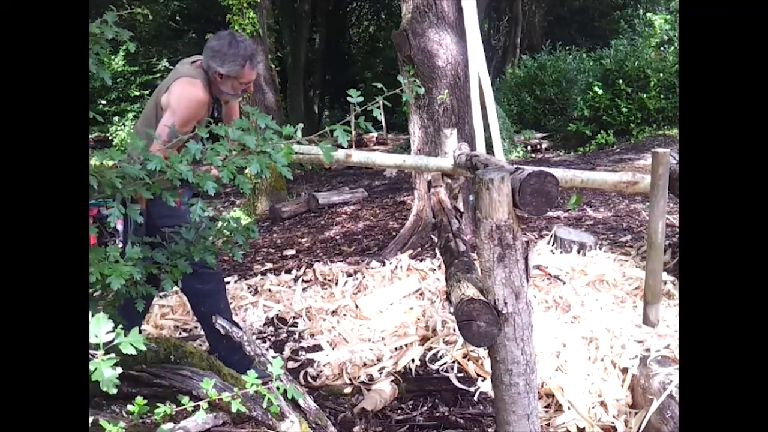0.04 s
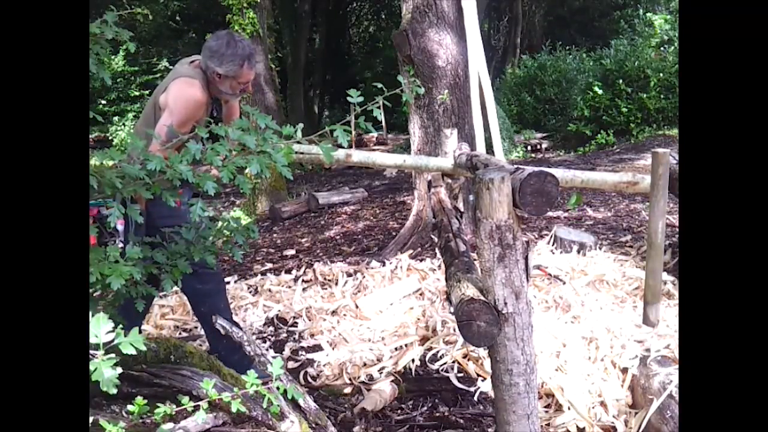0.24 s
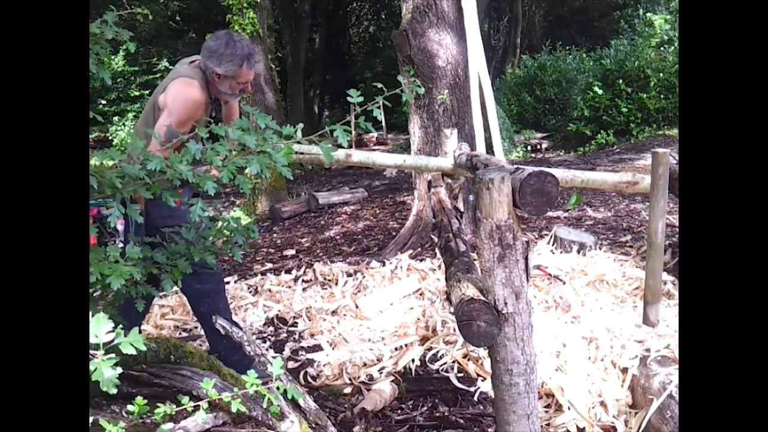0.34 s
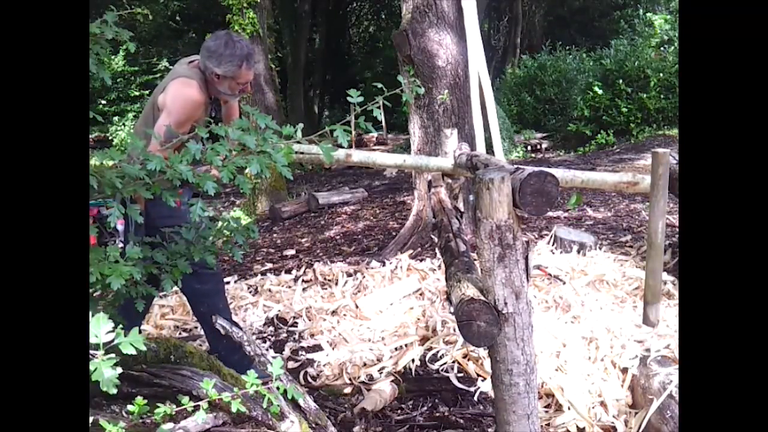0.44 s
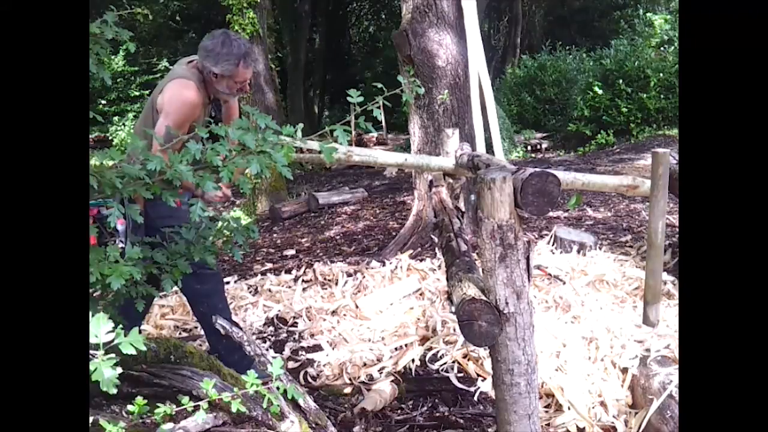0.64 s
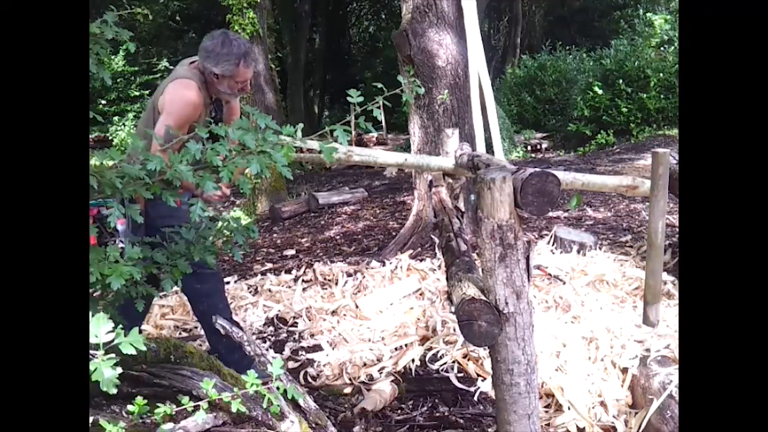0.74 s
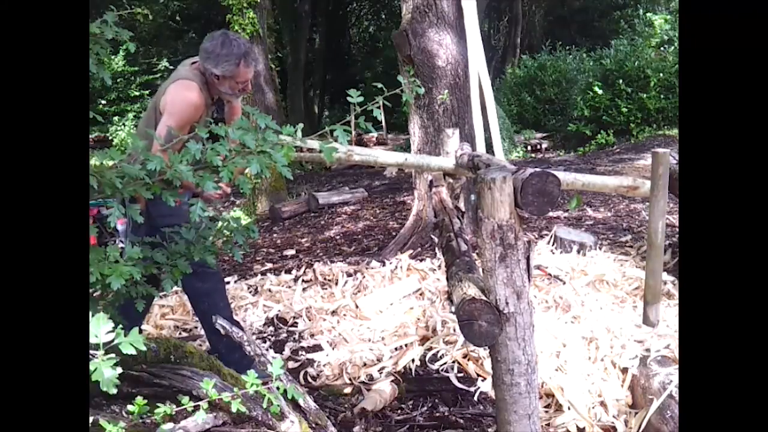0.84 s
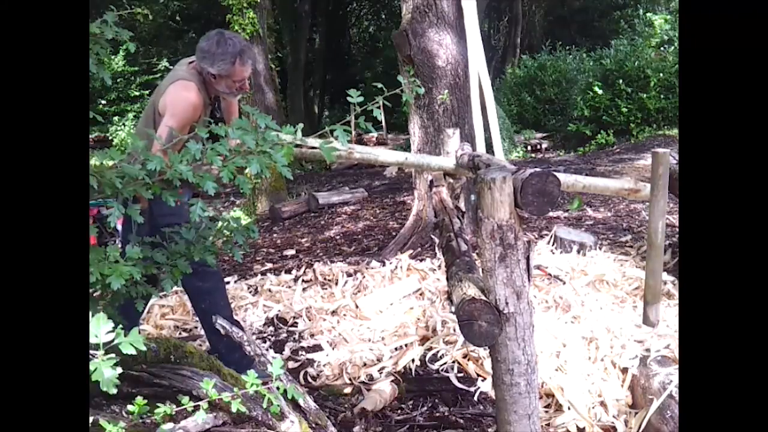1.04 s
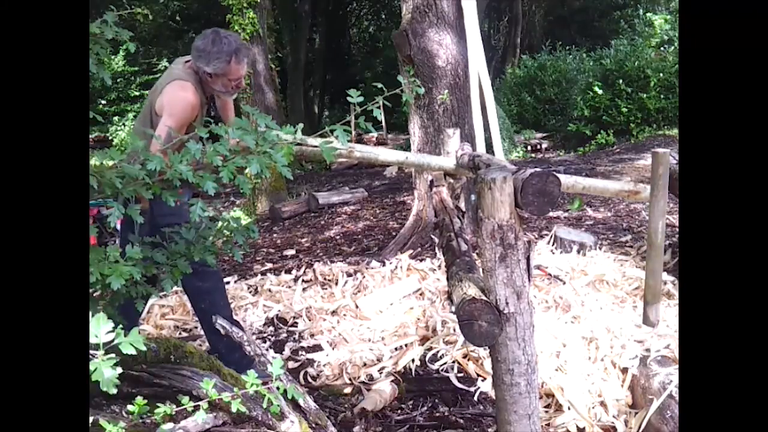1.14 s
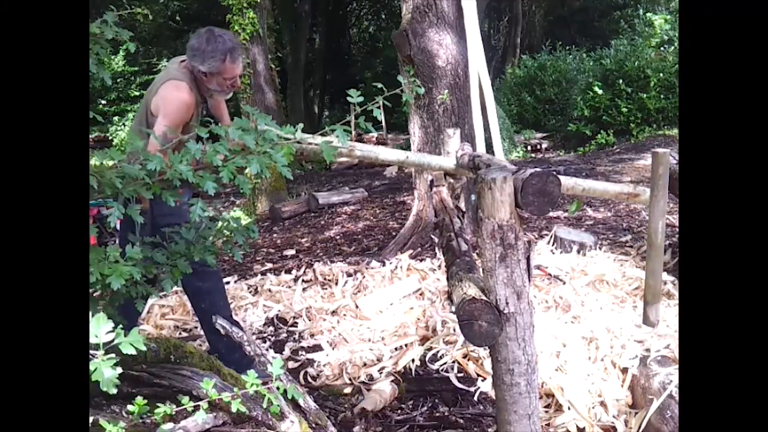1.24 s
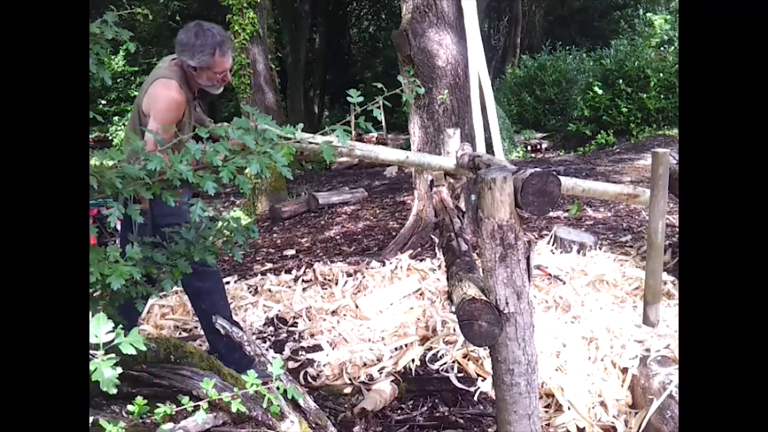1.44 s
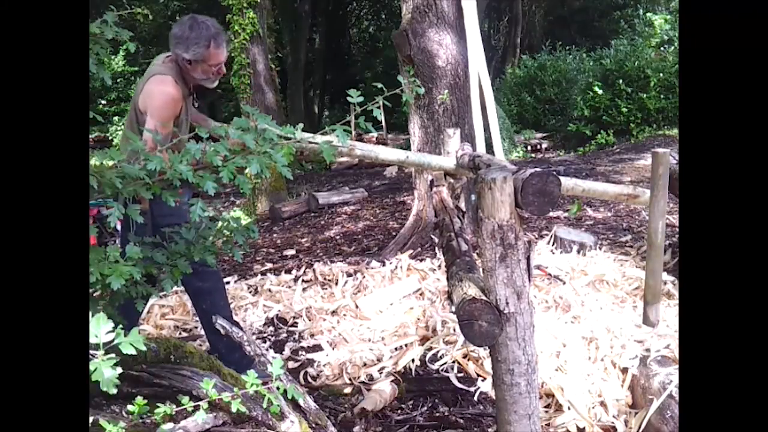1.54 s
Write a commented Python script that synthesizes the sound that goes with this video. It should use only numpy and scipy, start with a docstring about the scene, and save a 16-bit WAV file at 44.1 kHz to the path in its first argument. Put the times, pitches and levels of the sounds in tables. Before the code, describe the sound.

A wooden pole splits with sharp cracks and a snap, echoing briefly through the woods.

```python
"""Splitting a pole in the woods

A wooden pole is levered in a brake, a frame that grips it. A few fibres tick, the pole splits with
two sharp cracks and a snap, then it knocks against the brake. Each break rings the pole and tears a
short run of splinters. The trees scatter a bright echo over a soft rush of air and one far bird."""
import sys
import numpy as np
from scipy import signal
from scipy.fft import rfft, irfft
from scipy.io import wavfile
from scipy.ndimage import uniform_filter1d

SR = 44100
rng = np.random.default_rng(int(sys.argv[2]) if len(sys.argv) > 2 else 0)


def file_out(sig):
    """Save sig as 16-bit WAV at sys.argv[1]."""
    # one column per channel
    cols = np.atleast_2d(sig).T
    # limit, then scale
    lim = np.clip(cols, -1, 1)
    pcm = np.round(lim * 32767).astype(np.int16)
    wavfile.write(sys.argv[1], SR, pcm)


N = 70560

# The moments when the wood breaks. Each row: start in seconds, ring gain in dB, pitch in Hz above which
# the ring weakens, splinter gain in dB, splinter run in seconds, tilt in dB per octave, echo gain in dB.
BREAKS = [ (0.2370, 0, 9000, -1, 0.0039, -1, -2.5), (0.2778, -16, 5000, 4, 0.0036, -2, 2.5),
          (0.2792, 0, 9000, 5.5, 0.0056, 3, -4.5), (0.3230, -19.5, 4000, -5.5, 0.011, 1, -9),
          (0.3258, -17.5, 6060, -4.5, 0.00067, 1, 2), (0.3337, -18, 1820, -15, 0.0036, -2.5, -9),
          (0.3480, -53, 3000, -10, 0.009, -1, -17), (0.7106, -38, 2000, -18, 0.0051, -0.5, 6), ]
def breaks(t):
    """Each break rings the pole and tears splinters. Returns the direct sound and the echo's input."""
    direct, to_trees = 0, 0
    for start, ring_db, corner_hz, splinter_db, run_s, tilt_db, echo_db in BREAKS:
        body = undb(ring_db - 19) * pole(t, corner_hz, whole=start < 0.26)
        tear = undb(splinter_db + 9.5) * splinters(t, run_s, tilt_db)
        direct += at(start, body + tear)
        to_trees += undb(echo_db) * at(start, undb(-5) * body + tear)  # the ring carries less far
    return direct, to_trees


# The pole's own tones. Each row: pitch in Hz, gain in dB while whole, gain in dB once split,
# seconds to fade by 60 dB without the clamp.
POLE_TONES = [(225, -30, -12.5, 0.08), (408, -24.5, -11.5, 0.085), (588, -13, -27, 0.14),
              (1099, -21, -0.5, 0.073), (1325, 1.5, -3.5, 0.042), (1730, -2, -18, 0.062),
              (1968, -16, -3.5, 0.062), (2260, 0.5, -1, .046), (2672, -7, 3.5, 0.033), (2855, -13, 2, .035),
              (4580, -11.5, -6, .042), (4410, -19, 0, 0.055), (4830, -4.5, -3, 0.045),
              (5200, -19, 0.5, 0.055), (5776, -19, 8, 0.033), (5910, -7.5, 4, 0.033), (6640, -14, 2, 0.034)]
def pole(t, corner_hz, whole):
    """The pole rings after a break until the clamp stops it. Splitting changes the mix of tones."""
    rise_s, clamp_s = 0.00076, 0.033
    tones = [(hz, whole_db if whole else split_db, fade_s) for hz, whole_db, split_db, fade_s in POLE_TONES]
    return ring(t, tones, corner_hz) * (1 - np.exp(-t / rise_s)) * np.exp(-(t / clamp_s) ** 2)


# The tone colour of tearing fibres. Each row: frequency in Hz, gain in dB.
SPLINTER_COLOUR = [(40, -9), (150, -15), (550, -11), (1000, -1), (1900, -2), (2650, 0.5), (3300, -4.5),
                   (4400, 0), (5700, 2.5), (7000, 0), (10000, -5.5), (13000, -10.5)]
def splinters(t, run_s, tilt_db):
    """One fibre snaps and its neighbours follow in a dying run; each snap shakes the wood around it."""
    snaps_per_s, spread_db = 2500, 4
    snapping = rng.random(len(t)) < snaps_per_s / SR
    strength = undb(spread_db * rng.standard_normal(len(t)))
    direction = np.sign(rng.standard_normal(len(t)))
    snaps = unit(snapping * direction * strength * np.exp(-(t / run_s) ** 2))
    snaps[0] += 0.47  # the first fibre to go
    shaking = np.sqrt(np.abs(convolve(snaps ** 2, fade(t, fade_s=0.041) ** 2)))
    wood = unit(shaking * rng.standard_normal(len(t)))
    return colour(whiten(unit(snaps) + wood), SPLINTER_COLOUR, tilt_db)


# Single fibres giving way. Each row: start in seconds, pitch in Hz, level in dB, splinter run in seconds.
TICKS = [(0.1277, 4570, -20, .003), (0.1468, 4930, -19.5, 0.0043), (0.1646, 6400, -9.5, 0.00091),
         (0.7209, 4440, -12.5, 0.006), (0.856, 4060, -19, 0.022), (1.292, 4700, -30.5, 0.0035)]
def fibre_ticks(t):
    """Thin fibres snap, and each rings briefly at its own pitch."""
    ticks = 0
    for start, hz, db, run_s in TICKS:
        resonance = signal.iirpeak(hz, Q=2.8, fs=SR)
        tick = signal.lfilter(*resonance, splinters(t, run_s, tilt_db=0))
        ticks += at(start, undb(db) * unit(tick))
    return ticks


# The brake's own tones. Each row: pitch in Hz, gain in dB, seconds to fade by 60 dB.
BRAKE_TONES = [(188, -15, 0.084), (355, -16, 0.095), (665, -2, 0.055), (774, -2.5, 0.068),
               (905, -7.5, 0.062), (1090, -2.5, 0.037), (1363, 1, 0.047), (1666, -0.5, 0.044),
               (1966, -2.5, 0.042), (2120, -1.5, 0.047), (2790, -8.5, 0.046)]
# The pole's knocks on the brake. Each row: start in seconds, gain in dB.
KNOCKS = [(0.7106, -30), (0.8580, -46)]
def brake_knocks(t):
    """The pole bumps the brake and makes it ring."""
    rise_s = 0.00074
    knock = ring(t, BRAKE_TONES) * (1 - np.exp(-t / rise_s))
    return sum(at(start, undb(db) * knock) for start, db in KNOCKS)


# The trees' echo, band by band. Each row: centre in Hz, gain in dB, seconds for the far echo to fade 60 dB.
ECHO_BANDS = [(60, -0.5, 0.78), (297, -9.5, 0.17), (900, -22, 1), (1690, -13, 0.68), (2500, -9, 0.65),
              (3400, -9.5, 0.62), (5200, -9, 0.71), (7000, -11.5, 0.62), (10000, -10, 0.59)]
def tree_echo(t):
    """How the clearing answers a click: near trunks first, then the deeper wood rings on."""
    onset_s, trunk_spread_db = 0.02, 1.5
    centres_hz, gains_db, fades_s = np.array(ECHO_BANDS).T
    scatter = rng.standard_normal(N) * undb(trunk_spread_db * rng.standard_normal(N))
    spectrum = rfft(scatter / np.std(scatter))
    log_hz = np.log(np.maximum(np.fft.rfftfreq(N, 1 / SR), 1))
    onset = 1 - np.exp(-(t / onset_s) ** 2)
    near = undb(-1.5) * fade(t, fade_s=0.18)
    echo = 0
    for db, fade_s, this_band in zip(gains_db, fades_s, np.eye(len(ECHO_BANDS))):
        band = irfft(spectrum * np.interp(log_hz, np.log(centres_hz), this_band), N)
        echo += undb(db) * band * unit(onset * (near + fade(t, fade_s)))
    return echo


# The tone colour of distant air and leaves. Each row: frequency in Hz, gain in dB.
AIR_COLOUR = [(25, -2), (55, -1), (110, -8.5), (200, -3.5), (450, -3), (700, -1.5), (950, 1.5),
              (1250, -4.5), (1700, -12.5), (2500, -17.5), (4000, -18), (6300, -18), (10000, -28)]
def air(t):
    """A soft, steady rush from far away."""
    rush = colour(rng.standard_normal(len(t)), AIR_COLOUR)
    return undb(-51) * rush / np.std(rush)


# Points along a bird's call. Each row: time in seconds, pitch in Hz, level in dB.
BIRD_CALL = [(1.326, 5670, -80), (1.339, 5840, -63), (1.355, 5850, -67), (1.374, 5700, -63),
             (1.405, 5700, -78)]
def bird(t):
    """One thin, wavering call from far away."""
    waver_hz = 89
    times, hz, db = np.array(BIRD_CALL).T
    waver = uniform_filter1d(rng.standard_normal(N), size=200)
    pitch = np.interp(t, times, hz) + waver_hz * waver / np.std(waver)
    level = undb(np.interp(t, times, db)) * (t > times[0]) * (t < times[-1])
    return level * np.sin(2 * np.pi * np.cumsum(pitch) / SR)


def ring(t, tones, corner_hz=np.inf):
    """Fading tones after a push; a slower push (a lower corner) leaves out the high ones."""
    sound = 0
    for k, (hz, db, fade_s) in enumerate(tones):
        strength = undb(db) / np.hypot(1, (hz / corner_hz) ** 2)
        sound += (-1) ** k * strength * fade(t, fade_s) * np.sin(2 * np.pi * hz * t)
    return sound


def fade(t, fade_s):
    """A level that falls by 60 dB every fade_s seconds."""
    return np.exp(-np.log(1000) * t / fade_s)


def undb(db):
    """Turn decibels into a gain."""
    return 10 ** (np.asarray(db) / 20)


def unit(x):
    """Scale to an energy of 1."""
    return x / np.sqrt(np.sum(x ** 2) + 1e-18)


def at(start, x):
    """Place a sound at its start time in seconds."""
    return np.pad(x, (int(start * SR), N))[:N]


def convolve(x, response):
    """Pass a sound through a response, keeping its length."""
    return signal.fftconvolve(x, response)[:len(x)]


def shape(x, db):
    """Give each frequency its own gain, with no ringing ahead of the sound."""
    cepstrum = irfft(np.log(undb(db)))
    cepstrum[1:len(x)] *= 2
    cepstrum[len(x) + 1:] = 0
    return irfft(rfft(x, 2 * len(x)) * np.exp(rfft(cepstrum)))[:len(x)]


def colour(x, points, tilt_db=0):
    """Filter through (Hz, dB) points; a positive tilt, in dB per octave, brightens the sound."""
    hz = np.maximum(np.fft.rfftfreq(2 * len(x), 1 / SR), 1)
    point_hz, point_db = np.array(points).T
    tilt = tilt_db * np.log2(np.maximum(hz, 600) / 3000)
    return shape(x, np.interp(np.log(hz), np.log(point_hz), point_db) + tilt)


def whiten(x):
    """Even out a burst's frequencies so that it has no pitch of its own."""
    smooth_hz = 150
    power = np.abs(rfft(x, 2 * len(x))) ** 2
    smoothed = uniform_filter1d(power, int(smooth_hz * 2 * len(x) / SR))
    return unit(shape(x, -10 * np.log10(smoothed + 1e-12)))


def scene():
    """Mix the breaks, ticks and knocks with their echo, the air and the bird."""
    t = np.arange(N) / SR
    brief = t[:4096]  # time enough for one short burst
    background = air(t) + bird(t)
    echo = tree_echo(t)
    cracks, to_trees = breaks(brief)
    ticks, knocks = fibre_ticks(brief), brake_knocks(brief)
    to_trees += undb(-3) * ticks + undb(-6.5) * knocks
    return (cracks + ticks + knocks + convolve(to_trees, echo) + background)[None]


# The microphone's tone colour. Each row: frequency in Hz, gain in dB.
MIC_COLOUR = [(20, -2), (6800, 1.5), (7300, -5.5), (7750, -18), (8100, -25), (8500, -13), (9000, -6),
              (9600, -8.5), (10200, -14.5), (11000, -36)]
def record(dry):
    """A small microphone rounds the loudest peaks, dips part of the treble and cuts the very top."""
    overload, top_hz = 0.88, 11100
    rounded = overload * np.tanh(dry / overload)
    heard = np.array([colour(channel, MIC_COLOUR) for channel in rounded])
    return signal.sosfilt(signal.ellip(8, 0.2, 70, top_hz, fs=SR, output="sos"), heard)


dry = scene()
out = record(dry)
file_out(out)
```